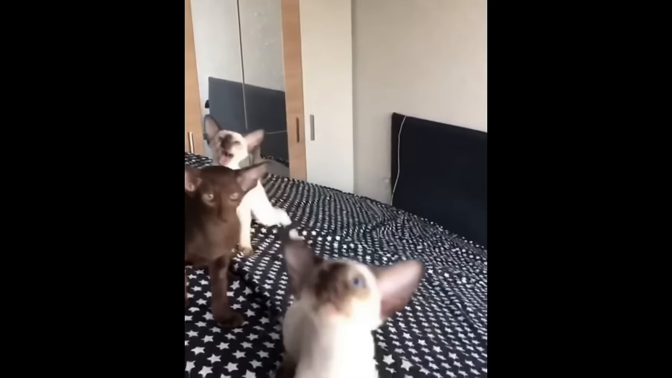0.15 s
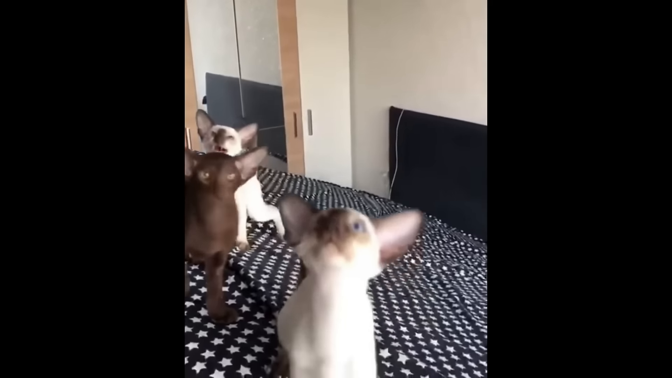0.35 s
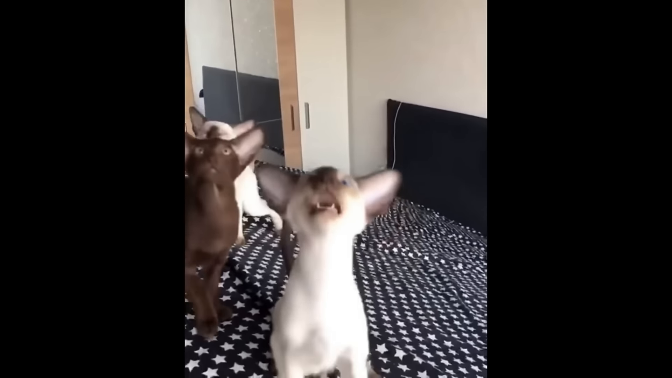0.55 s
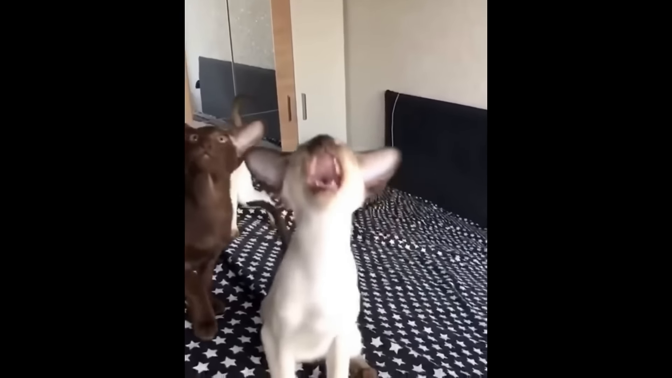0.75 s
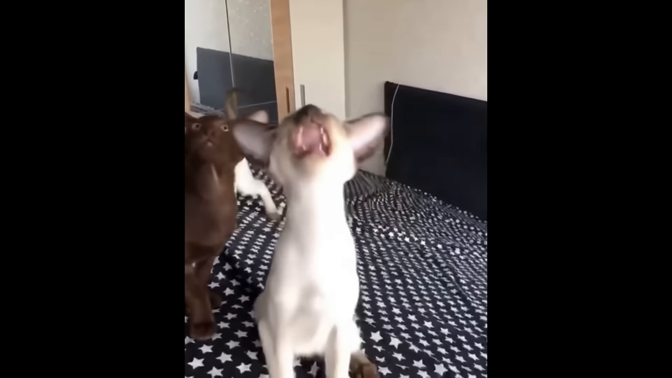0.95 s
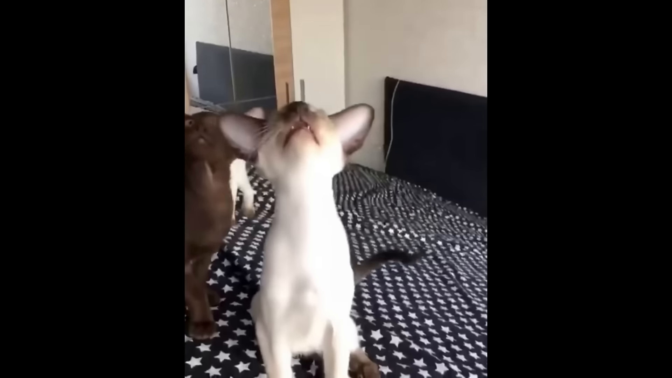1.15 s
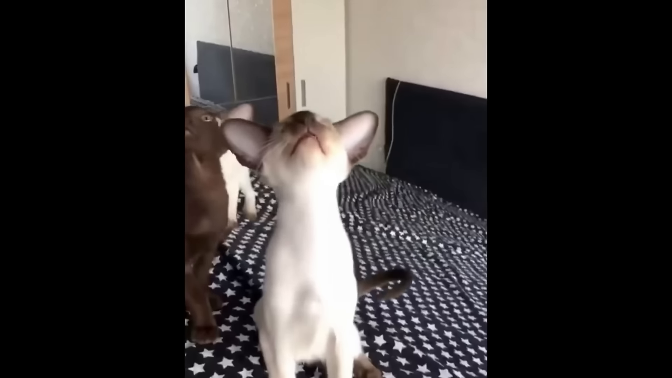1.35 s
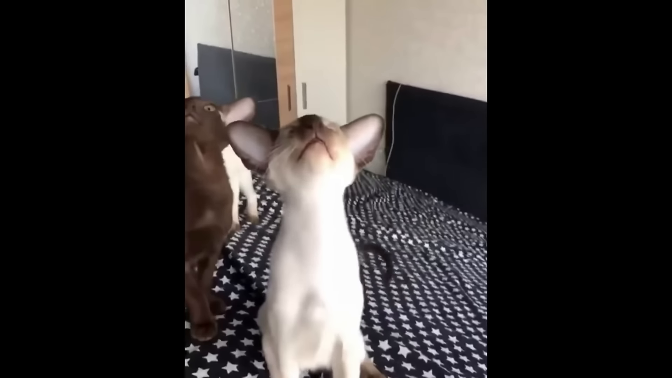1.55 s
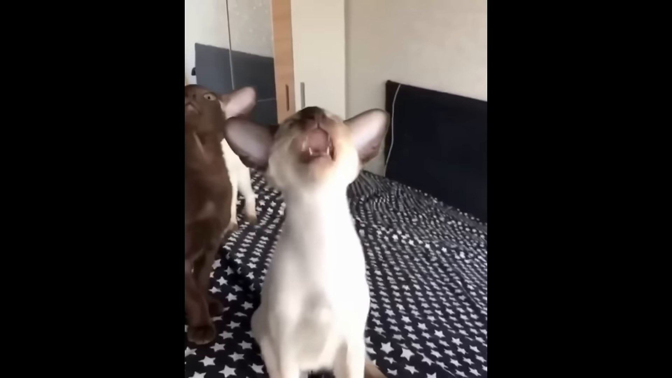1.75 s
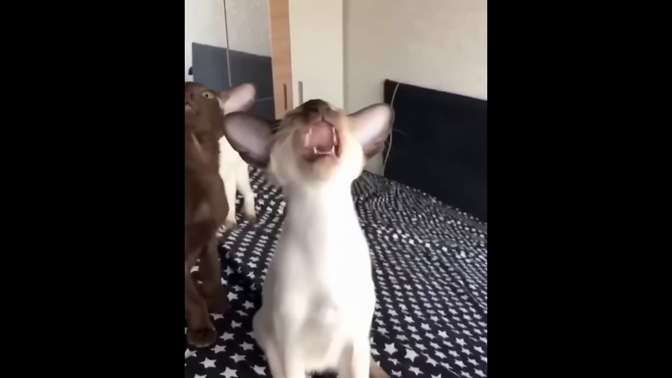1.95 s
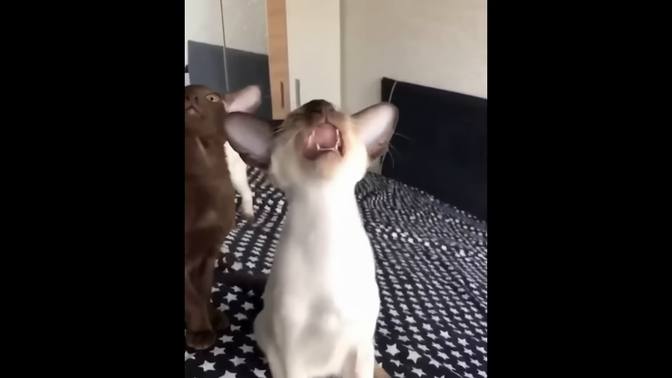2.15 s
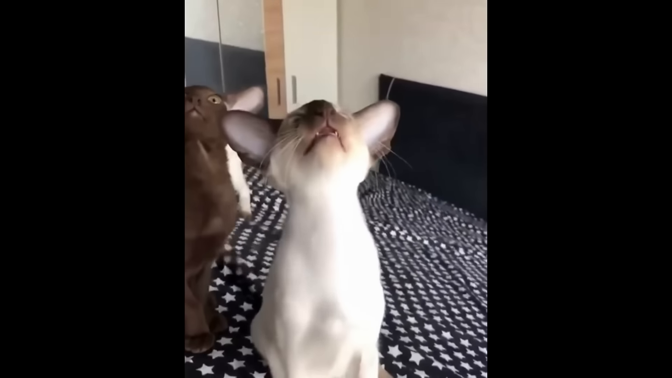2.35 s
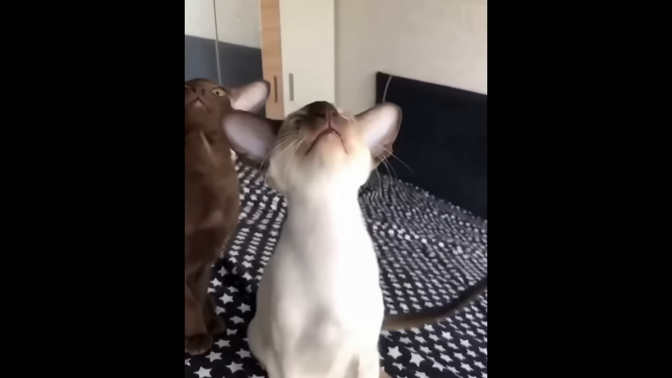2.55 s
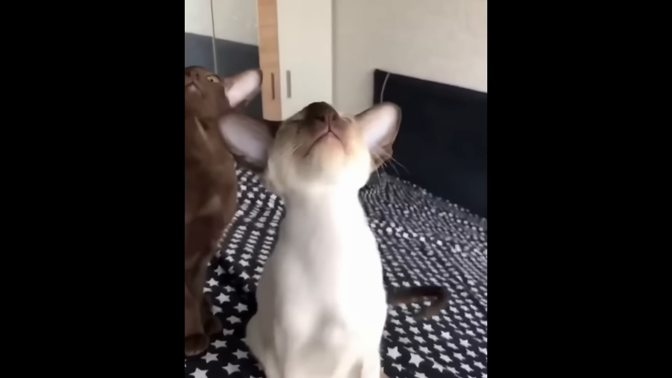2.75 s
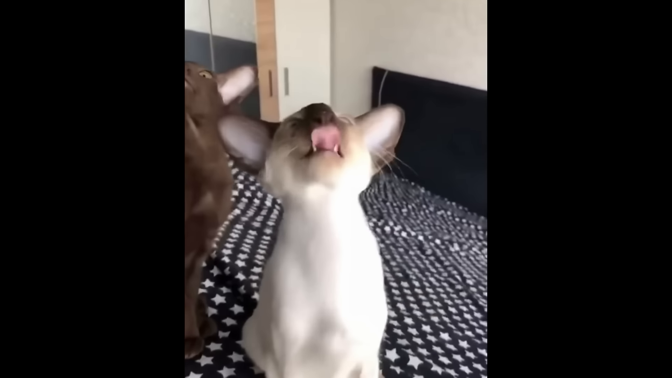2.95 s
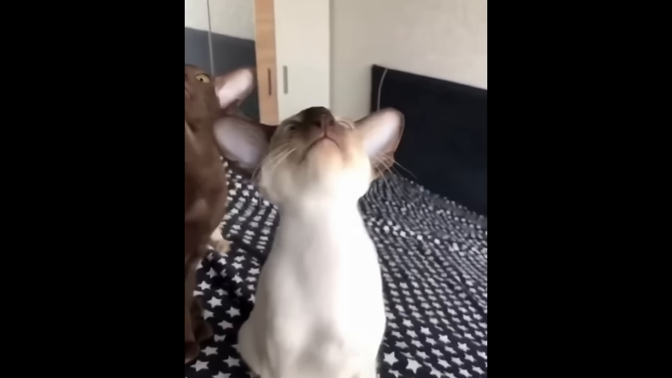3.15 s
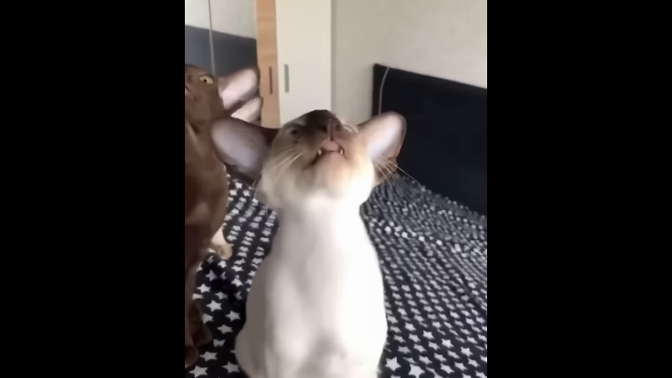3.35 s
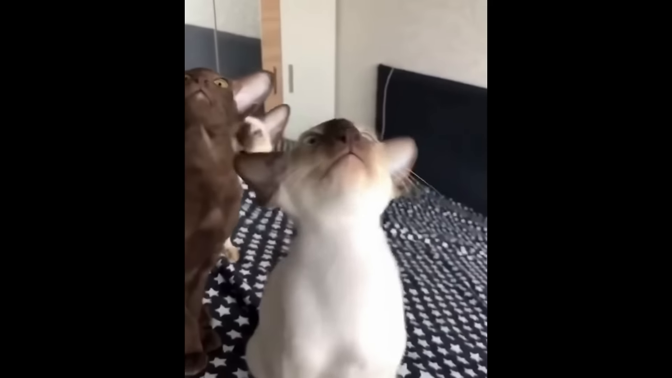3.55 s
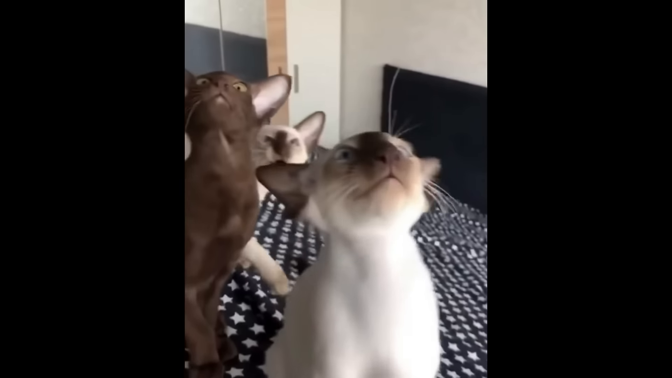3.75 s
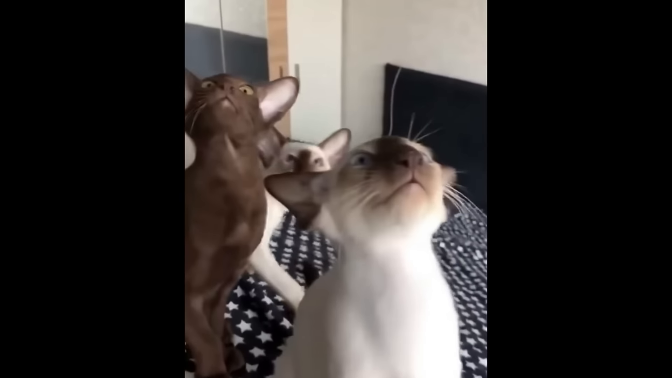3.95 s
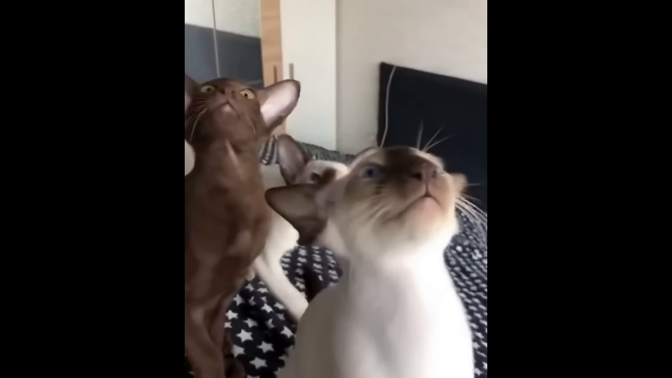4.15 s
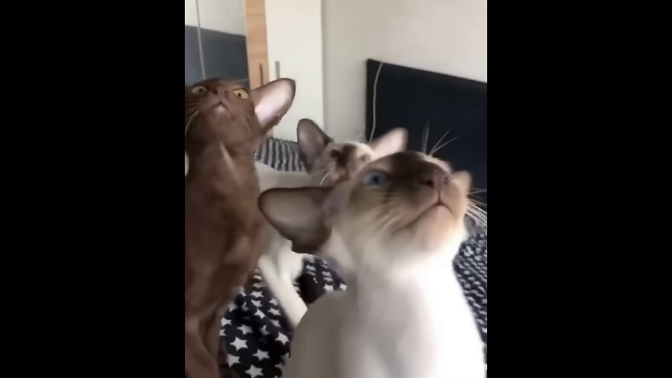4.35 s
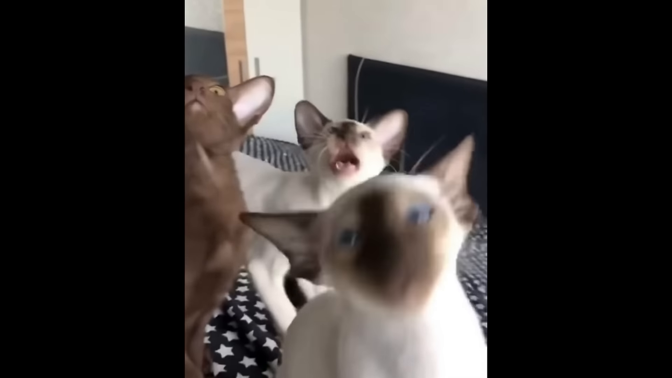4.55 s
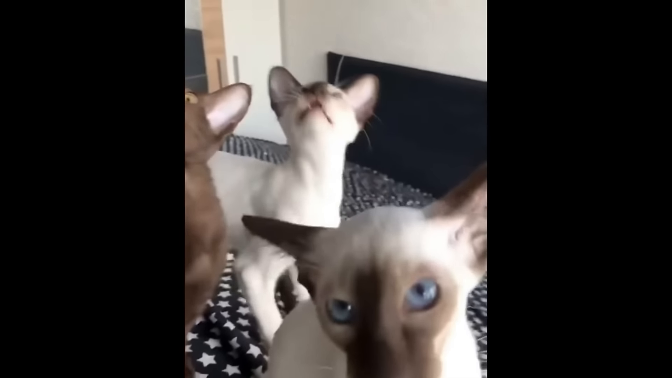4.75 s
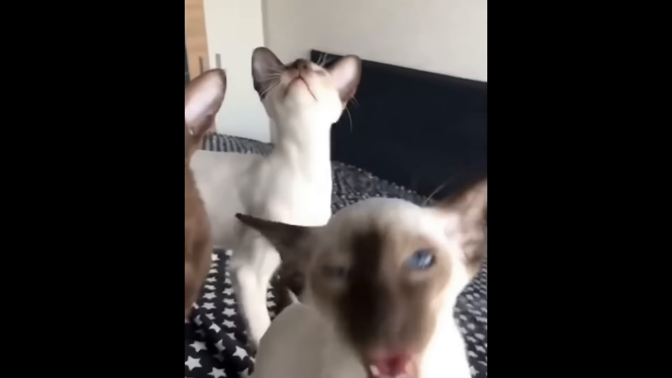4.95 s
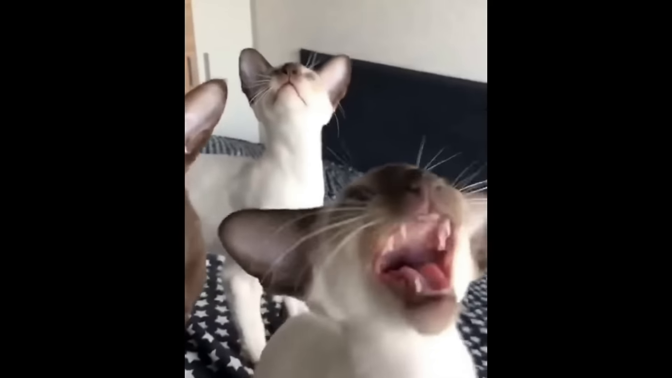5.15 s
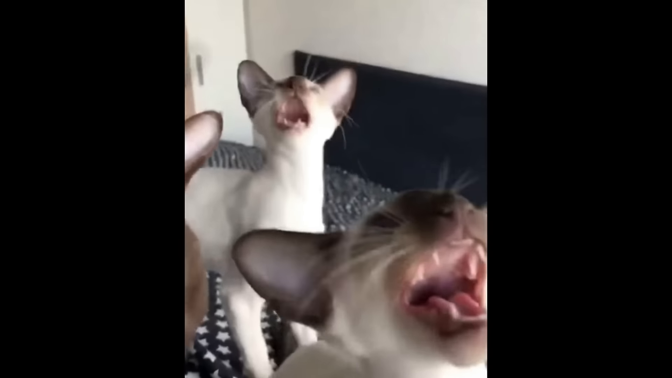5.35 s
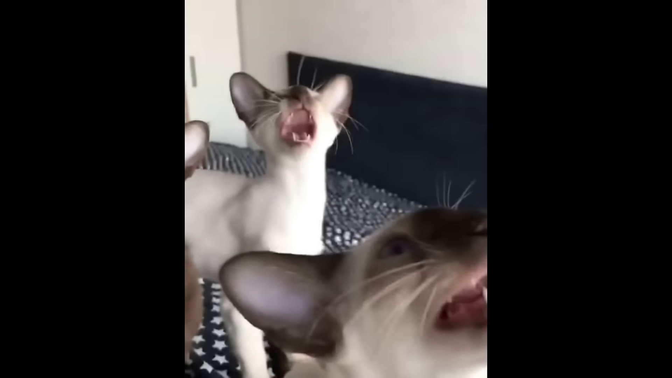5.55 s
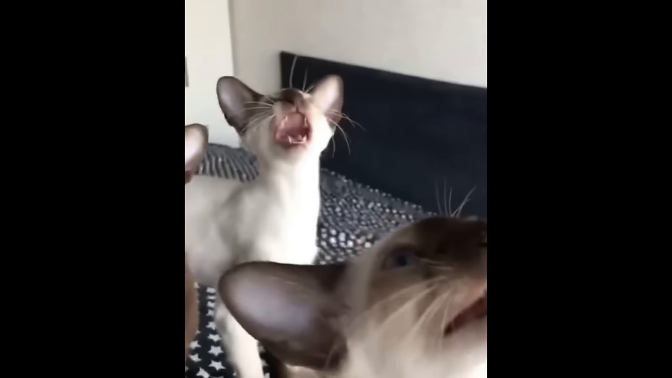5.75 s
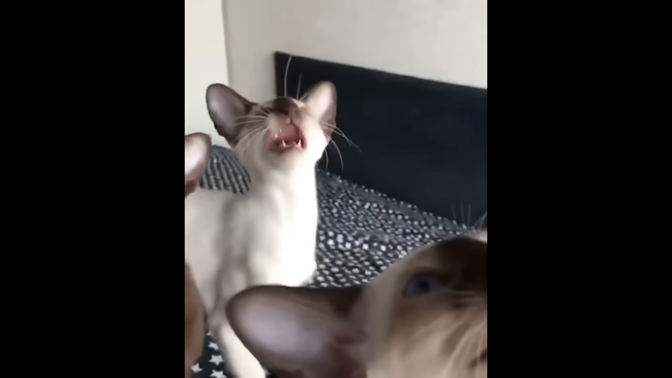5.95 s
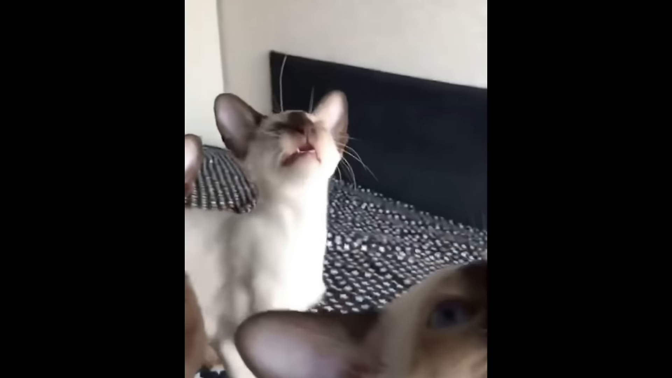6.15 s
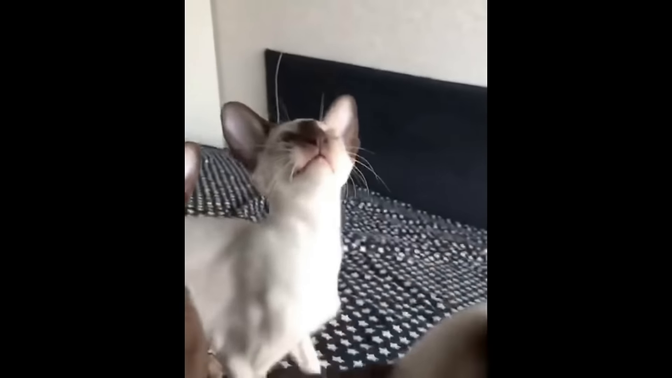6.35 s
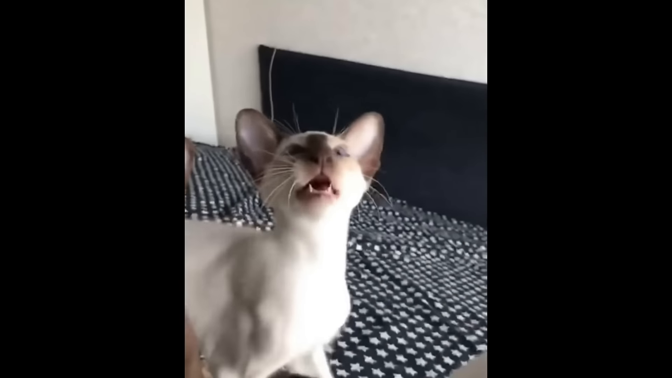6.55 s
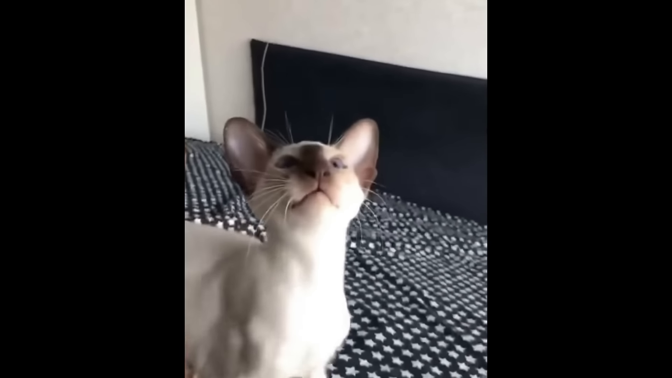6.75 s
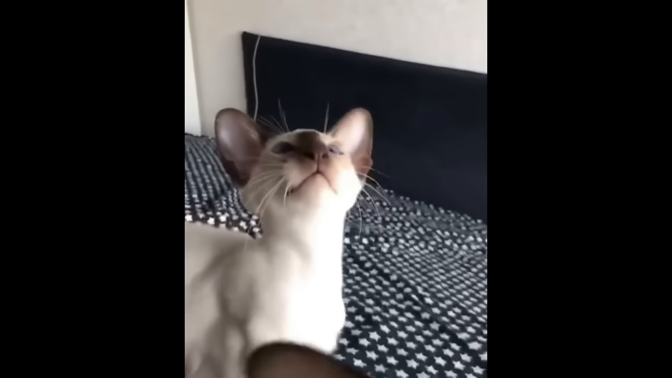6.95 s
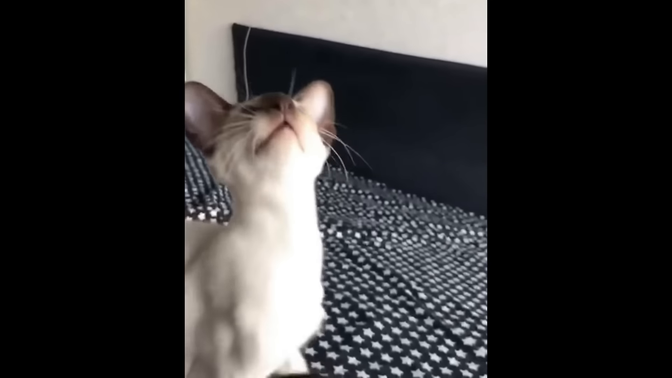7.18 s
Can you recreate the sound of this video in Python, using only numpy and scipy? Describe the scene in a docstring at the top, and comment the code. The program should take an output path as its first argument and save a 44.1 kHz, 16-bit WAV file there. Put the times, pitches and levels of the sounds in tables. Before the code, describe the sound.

Several cats in a small bedroom meow in turn, clear rising-and-falling cries mixed with hoarse cracking wails, growing louder and closer toward the end.

```python
"""A small bedroom: several cats on a bed meow in turn, at times two at once, close to the microphone.
Each meow is a stack of 18 partials on a gliding pitch, clean when settled and hoarse at breaks and some ends,
with noise for the leaking air. A huff is unvoiced noise; lips smack and paws thud as damped rings;
a paw scuffs the cover as grainy noise, a low groan is noise in resonances, and the room hums faintly."""
import sys
import numpy as np
from scipy import signal
from scipy.fft import rfft, irfft
from scipy.io import wavfile

SR = 44100
rng = np.random.default_rng(int(sys.argv[2]) if len(sys.argv) > 2 else 0)


def generate_wav(signal):
    """Clip the signal to [-1, 1] and save it as 16-bit WAV at the path in sys.argv[1]."""
    frames = np.transpose(np.atleast_2d(signal))
    scaled = np.clip(frames, -1, 1) * 32767
    pcm = np.round(scaled).astype(np.int16)
    wavfile.write(sys.argv[1], SR, pcm)


N = 318190


def from_db(db):
    """Amplitude of a level in dB."""
    return 10 ** (np.asarray(db) / 20)


def rms_one(x):
    """Scale a signal to rms 1."""
    return x / np.sqrt(np.mean(x ** 2) + 1e-20)


def at_hz(points, hz):
    """Read a spectrum in dB, in straight lines over log frequency."""
    corner_hz, corner_db = np.array(points).T
    return np.interp(np.log(hz), np.log(corner_hz), corner_db)


def span(rows):
    """First sample, sample times, short end fades and the interpolated columns of one table."""
    s, *columns = np.transpose(rows)
    first = max(round(s[0] * SR), 0)
    t = np.arange(first, min(round(s[-1] * SR), N)) / SR
    fade = np.clip(np.minimum(t - s[0], s[-1] - t) / 0.004, 0, 1)
    return first, t, fade, [np.interp(t, s, c) for c in columns]


def wobble(size, hz):
    """Slow random motion: noise twice through a one-pole low-pass, rms 1."""
    r = np.exp(-2 * np.pi * hz / SR)
    settle = 3000   # samples dropped while the filter settles
    noise = rng.standard_normal(size + settle)
    return rms_one(signal.lfilter([1], [1, -2 * r, r * r], noise)[settle:])


def coloured(size, spectrum):
    """Noise of the given spectrum, rms 1."""
    hz = np.maximum(np.fft.rfftfreq(size, 1 / SR), 1)
    shaped = rfft(rng.standard_normal(size)) * from_db(at_hz(spectrum, hz))
    return rms_one(irfft(shaped, size))


def resonate(x, hz, width):
    """A two-pole resonance of the given centre and width in Hz."""
    r = np.exp(-np.pi * width / SR)
    poles = [1, -2 * r * np.cos(2 * np.pi * hz / SR), r * r]
    return signal.lfilter([(1 - r * r) / 2, 0, (r * r - 1) / 2], poles, x + 1e-18)


# Instants at which the voice breaks, in seconds.
VOICE_CRACKS = [2.895, 3.135, 3.465]
CRACK_S, CRACK_DROP, CRACK_ROUGH = .011, .12, .2   # half length (s), share of pitch lost, hoarseness added
CROAK_HZ, CROAK_SPAN_HZ, CROAK_ROUGH = 640, 40, .3   # a voice that sinks below this pitch croaks
HOARSE_END_S = .05   # the end of a meow frays for this long


def hoarseness(t, begin_s, stop_s, pitch, open_db, hoarse, strain, crack):
    """Unevenness of the vocal folds: settled, plus onset, cracks, frayed end, strain and croak."""
    settled, start, settle_s, end = hoarse
    rough = settled + start * np.exp(-((t - begin_s) / settle_s) ** 4.0)
    rough = rough + CRACK_ROUGH * crack
    rough = rough + end * np.clip(1 - (stop_s - t) / HOARSE_END_S, 0, 1)
    rough = rough + strain * np.maximum(open_db + 15, 0)   # a mouth opened beyond -15 dB strains
    return rough + CROAK_ROUGH * np.clip((CROAK_HZ - pitch) / CROAK_SPAN_HZ, 0, 1)


SECOND_FOLLOWS, THIRD_FOLLOWS = 0.53, 1.018   # share of the mouth opening felt by the 2nd and 3rd partial
CLOSED_TILT = 0.34   # above the 4th partial: dB per octave lost for each dB that the mouth closes
SHUT_DB = -20   # mouth opening that counts as shut
SHRILL_HZ, SHRILL_WIDTH_HZ = 4420, 500


def partial_gains(orders, pitch, db, open_db, facing_db, manner, throat, mouth):
    """Throat and mouth weight the partials; those from the 4th up share the level set by the opening."""
    second_db, third_db, odd_db, shrill_db = manner
    second = db + second_db + SECOND_FOLLOWS * open_db
    third = db + third_db + THIRD_FOLLOWS * open_db + at_hz(mouth, orders[2] * pitch)
    high_hz = orders[3:] * pitch
    beam = np.clip(2 * np.log2(high_hz / 4800), 0, 1)   # only short waves are beamed forward
    high_db = at_hz(throat, high_hz) + facing_db * beam
    high_db = high_db + shrill_db * np.exp(-((high_hz - SHRILL_HZ) / SHRILL_WIDTH_HZ) ** 2)
    high_db = high_db + CLOSED_TILT * np.minimum(open_db, 0) * np.log2(orders[3:] / orders[3])
    high = from_db(high_db)
    high = from_db(db + open_db) * high / np.sqrt(np.sum(high ** 2, axis=0))
    sway = np.array([wobble(len(pitch), 7.2) for k in orders])   # the mouth never holds still
    gains = np.vstack([from_db([db, second, third]), high])
    gains = gains * from_db(1.8 * sway * np.sqrt(orders) * (orders > 3))
    gains[2::2] *= from_db(odd_db * np.clip(open_db / SHUT_DB, 0, 1))   # odd overtones, mouth shut
    return gains


# Air past the teeth. Each row: frequency in Hz, relative level in dB per Hz.
TEETH_SPECTRUM = [(3000, -31.5), (6000, -0.5), (8000, 4.5), (9500, -13.5)]
ATTACK_S = .007
RELEASE_S, RELEASE_DB = 0.054, -33.5
TURN_LATE = 2.86   # the head turns mostly towards the end of a meow: power of the elapsed share


def meow(rows, manner, hoarse, strain, throat, mouth):
    """Vocal folds: uneven cycles smear the partials, the higher the more; leaking air hisses."""
    orders = np.arange(1, 19)[:, None]
    begin_s, stop_s = rows[0][0], rows[-1][0]
    released = rows + [(stop_s + RELEASE_S, *rows[-1][1:])]
    first, t, fade, (pitch, db, open_db) = span(released)
    size = len(t)
    db = db + RELEASE_DB * np.clip((t - stop_s) / RELEASE_S, 0, 1)
    fade = fade * np.clip((t - begin_s) / ATTACK_S, 0, 1)

    crack = np.sum(np.exp(-((t - np.array(VOICE_CRACKS)[:, None]) / CRACK_S) ** 2), axis=0)
    rough = hoarseness(t, begin_s, stop_s, pitch, open_db, hoarse, strain, crack)
    pitch = pitch * (1 - CRACK_DROP * crack)
    pitch = pitch * (1 + rough * 0.043 * wobble(size, 43.1))   # a hoarse voice wavers
    cycles = np.cumsum(pitch) / SR + rough * .033 * wobble(size, 150)

    elapsed = np.clip((t - begin_s) / (stop_s - begin_s), 0, 1)
    facing_db = np.interp(elapsed ** TURN_LATE, [0, 1], manner[4:])
    gains = partial_gains(orders, pitch, db, open_db, facing_db, manner[:4], throat, mouth)
    broken = np.array([wobble(size, 70) for k in orders])   # hoarse partials break up one by one
    gains = gains * from_db(rough * 7.5 * broken * (orders > 1))
    phases = 2 * np.pi * orders * cycles + 0.45 * orders ** 2
    tone = np.sum(gains * np.cos(phases), axis=0) * np.sqrt(2)
    shimmer = from_db(rough * 2.16 * wobble(size, 120))

    puffs = 1 + np.cos(2 * np.pi * cycles)   # air escapes once a cycle
    effort = np.sqrt(np.sum(gains[2:] ** 2, axis=0))
    hiss = coloured(size, throat) + from_db(facing_db - 3.5) * coloured(size, TEETH_SPECTRUM)
    air = rough * .32 * effort * puffs * hiss
    return first, fade * (tone * shimmer + air)


def voice(meows, manners, hoarse_rows, strain, throat, mouth):
    """Lay the meows of one throat along the timeline; overlaps add."""
    out = np.zeros(N)
    for rows, manner, hoarse in zip(meows, manners, hoarse_rows):
        first, sound = meow(rows, manner, hoarse, strain, throat, mouth)
        out[first:first + len(sound)] += sound
    return out


# First voice, one table per meow. Each row: time in seconds, pitch in Hz, fundamental in dB,
# mouth opening as the overtones from the 4th partial up over the fundamental in dB.
FIRST_MEOWS = [
    [(.078, 1010, -55, -8), (.207, 1084, -62.5, 0), (.27, 1063, -59.5, -4.5), (.398, 1092, -56, -4),
     (.47, 1105, -59, -0.5), (.524, 1113, -67.5, 6), (.62, 1110, -56, 3.5)],
    [(.632, 851, -50.5, -4.5), (.66, 785, -49.5, 4), (.73, 880, -49.5, 6.5), (.775, 978, -46.5, -22),
     (.81, 894, -62, 0)],
    [(.85, 1000, -44, -11.5), (.901, 906, -46, 1), (.928, 940, -48, 6.5), (.965, 1013, -42, -16),
     (1.19, 986, -48.5, -17.5), (1.21, 963, -61.5, -6), (1.25, 960, -69, 1)],
    [(1.823, 836, -55, -0.5), (1.855, 811, -56, 11), (1.886, 845, -49, 4.5), (1.93, 945, -52.5, -13),
     (2.05, 971, -42.5, -17.5), (2.075, 937, -46.5, 2.5), (2.115, 936, -49.5, 5.5), (2.14, 976, -45, -3),
     (2.175, 1030, -43, -15), (2.338, 930, -52.5, -16), (2.365, 910, -70, 2.5)],
    [(4.972, 773, -53, -21), (5.015, 802, -54.5, -4.5), (5.045, 849, -47, 6), (5.09, 891, -43.5, 5),
     (5.133, 958, -42.5, -5.5), (5.181, 1004, -39.5, -6), (5.226, 950, -41.5, 3.5),
     (5.256, 1049, -38, -8.5), (5.355, 1010, -38, -3), (5.47, 1048, -38, -7), (5.62, 997, -41.5, -12.5)],
    [(6.726, 955, -40, -24), (6.765, 891, -38, -0.5), (6.8, 913, -42.5, 3), (6.835, 969, -37.5, -7),
     (6.86, 1027, -35.5, -18), (6.95, 995, -31, -13), (7.032, 1047, -33, -17), (7.145, 1065, -31.5, -12),
     (7.214, 1083, -30, -19)],
]
# One row per meow: 2nd partial over the fundamental (opening at 0 dB) in dB, lift of the 3rd partial in dB,
# lift of odd overtones with the mouth shut in dB, relative lift of the shrill resonance in dB,
# mouth turned to the microphone as heard in the treble, at the start in dB, at the end in dB.
FIRST_MANNER = [(-5.5, 6, -1, 3.5, -6, -10), (-2.5, 2, 1, 0.1, 0, -6), (0.1, 0.8, -9.5, 5, -0.5, 0),
                (1.4, 0.8, -5, 1.5, -0.7, -0.5), (-2.5, 3.5, -0.5, -0.7, -2.5, 5),
                (5, -2.2, 0.1, -1.1, 1.5, 0)]
# Hoarseness, one row per meow: settled 0-1, added at the start 0-1, settles within seconds,
# added at the end 0-1.
FIRST_HOARSE = [(.17, .3, .04, 0), (.14, .15, .07, .2), (.04, .1, .1, .6), (.04, .2, .07, .8),
                (.02, 0, .1, 0), (.02, .1, .12, 0)]
# Throat and mouth. Each row: frequency in Hz, relative level in dB per Hz.
FIRST_THROAT = [(880, -52.5), (1500, -8.5), (1750, -8.5), (1980, 1.5), (2170, 1.5), (3210, -16.5),
                (6320, -25.5), (8530, -29.5), (9430, -12), (12300, -46), (20700, -120)]
# Mouth resonance swept by the 3rd partial. Each row: frequency in Hz, level over the higher partials in dB.
FIRST_MOUTH = [(2300, -1.9), (2650, 2.5), (2850, -1), (3150, -10)]


def first_voice():
    """Meows mostly near 1000 Hz; opening the mouth strains the folds by .007 hoarseness per dB."""
    return voice(FIRST_MEOWS, FIRST_MANNER, FIRST_HOARSE, .007, FIRST_THROAT, FIRST_MOUTH)


# Second voice, one table per meow: two short hoarse answers near 1000 Hz under the first meow,
# then lower meows. Each row: time in seconds, pitch in Hz, fundamental in dB,
# mouth opening as the overtones from the 4th partial up over the fundamental in dB.
SECOND_MEOWS = [
    [(.207, 997, -67, 12), (.232, 923, -52.5, 1), (.27, 974, -67.5, 10.5), (.31, 997, -60.5, -2.5)],
    [(.482, 1037, -48.5, -6.5), (.506, 1050, -54.5, 2.5), (.57, 1036, -64, 5)],
    [(2.547, 861, -54, -6), (2.575, 823, -59.5, 8), (2.614, 815, -60, 5.5), (2.621, 572, -57, 5.5),
     (2.64, 566, -59.5, 5), (2.647, 885, -60, 4.5), (2.7, 997, -60, -6), (2.75, 1021, -58, 1),
     (2.805, 997, -53.5, 5), (2.865, 725, -67.5, 20.5), (2.9, 695, -64, 23.5), (2.96, 753, -64, 14.5),
     (3.03, 879, -56, 4.5), (3.05, 811, -54, 5), (3.095, 822, -60, 12), (3.14, 703, -55, 9.5),
     (3.206, 799, -66, 14), (3.284, 782.4, -58.5, 12), (3.331, 707.6, -56.5, 13), (3.36, 743, -59, 12.5),
     (3.43, 742, -55, 7), (3.47, 717, -52.5, 3.5), (3.553, 777, -55, 1.5), (3.622, 684.3, -55.5, 10),
     (3.753, 697.3, -58, 16.5), (3.783, 671, -56.5, 15), (3.795, 594, -51.5, 11.5), (3.822, 631, -56.5, 14),
     (3.87, 549, -53.5, 9.5)],
    [(4.25, 798, -56, -10), (4.284, 926, -56, 3.5), (4.3, 768, -57, 5), (4.346, 846, -58, 3.5),
     (4.376, 774, -53.5, -1), (4.403, 828, -55.5, 4), (4.475, 804.4, -54.5, 7), (4.55, 758.6, -58.5, 10),
     (4.607, 786, -58, 8), (4.657, 708, -53, 10), (4.668, 568, -51.5, 4), (4.7, 566, -50, 1.5)],
    [(5.36, 884, -55, 0), (5.4, 772, -59, 0), (5.46, 866, -55, 4.5), (5.519, 911, -54.5, 8),
     (5.59, 861, -54, 10), (5.605, 733, -57.5, 12.5), (5.783, 772, -58.5, 14), (5.9, 702, -53, 14),
     (6.0, 647, -55, 20.5), (6.106, 624.5, -51, 13), (6.125, 577, -49, 6.5), (6.14, 521.5, -51, 5)],
    [(6.552, 707, -40, -20), (6.564, 555, -50.5, -7.5), (6.6, 531, -55, 7.5), (6.618, 477, -50, -4),
     (6.635, 457, -56.5, -3)],
]
# One row per meow: 2nd partial over the fundamental (opening at 0 dB) in dB, lift of the 3rd partial in dB,
# lift of odd overtones with the mouth shut in dB, relative lift of the shrill resonance in dB,
# mouth turned to the microphone as heard in the treble, at the start in dB, at the end in dB.
SECOND_MANNER = [(-4.5, -2.5, 0, -4, -10.5, 5), (-11, -3, 0, 9, -24, -11), (-1.5, 0.3, 0, 3.5, -6, 8.5),
                 (2.5, 3, 0, -0.5, -2.5, 7), (0.5, 0, 0, 0, 2.2, 10.5), (5.1, 8.2, 0, -1, 7, 13)]
# Hoarseness, one row per meow: settled 0-1, added at the start 0-1, settles within seconds,
# added at the end 0-1.
SECOND_HOARSE = [(.6, 0, .05, 0), (.6, 0, .05, 0), (.04, .42, .95, 0), (.12, .4, .08, 0),
                 (.06, .28, .25, 0), (0, .1, .02, .1)]
# Throat and mouth. Each row: frequency in Hz, relative level in dB per Hz.
SECOND_THROAT = [(880, -33), (1500, -34), (1900, -1), (2380, 1), (3580, -11.5), (4270, -7), (5590, -25.5),
                 (8470, -29.5), (9430, -11), (12300, -80), (20700, -120)]
# Mouth resonance swept by the 3rd partial. Each row: frequency in Hz, level over the higher partials in dB.
SECOND_MOUTH = [(1700, -7.5), (2050, -7), (2350, 5.5), (2750, 3), (3000, -4)]


def second_voice():
    """Two short hoarse answers near 1000 Hz under the first meow, then lower meows that crack and croak."""
    return voice(SECOND_MEOWS, SECOND_MANNER, SECOND_HOARSE, 0, SECOND_THROAT, SECOND_MOUTH)


# A cat huffs before it meows. Each row: time in seconds, level of the throat air in dB.
HUFF_LEVEL = [(4.17, -74), (4.245, -61.5), (4.3, -63)]


def huff():
    """Unvoiced air through throat and teeth."""
    out = np.zeros(N)
    first, t, fade, (db,) = span(HUFF_LEVEL)
    air = coloured(len(t), SECOND_THROAT) + 0.89 * coloured(len(t), TEETH_SPECTRUM)
    out[first:first + len(t)] = fade * from_db(db) * air
    return out


def blips(events, turns):
    """Damped rings with grain, one per event; each decays by a factor e in this many cycles."""
    out = np.zeros(N)
    for s, db, hz in events:
        t = np.arange(round(4 * turns / hz * SR)) / SR
        ring = from_db(db) * np.sin(2 * np.pi * hz * t) * np.exp(-t * hz / turns)
        at = round(s * SR)
        out[at:at + len(t)] += ring * (1 + 0.3 * rng.standard_normal(len(t)))
    return out


# Lips part. Each row: start in seconds, level before the decay in dB, frequency in Hz.
LIP_SMACKS = [(2.4639, -56, 2750), (4.9297, -43, 6020), (4.9505, -37, 3200), (4.9708, -38, 3610),
              (6.4103, -56, 3830), (6.4704, -56, 5130), (6.4962, -49, 3570)]


def lips():
    """Lips part with a short ring."""
    return blips(LIP_SMACKS, turns=5.8)


# Paws land. Each row: start in seconds, level before the decay in dB, frequency in Hz.
PAW_THUDS = [(0.411, -50.5, 304), (4.567, -51, 190), (6.221, -56.5, 103)]


def paws():
    """Paws land with a dull, heavily damped ring."""
    return blips(PAW_THUDS, turns=1.7)


# A paw drags over the cover. Each row: time in seconds, level in dB.
SCUFF_LEVEL = [(1.62, -66), (1.65, -50.5), (1.8, -53), (1.87, -62)]
# Colour of the cover under the paw. Each row: frequency in Hz, relative level in dB per Hz.
SCUFF_SPECTRUM = [(120, -56), (200, -24), (347, -9.5), (493, -16.5), (709, -1.5), (878, -8), (3000, -27),
                  (4000, -29.5), (5200, -68), (8800, -120)]


def scuff():
    """Friction on the cover: coloured noise whose level jitters into grains."""
    out = np.zeros(N)
    first, t, fade, (db,) = span(SCUFF_LEVEL)
    grain_db = 1.3 * wobble(len(t), 60)
    out[first:first + len(t)] += fade * from_db(db + grain_db) * coloured(len(t), SCUFF_SPECTRUM)
    return out


# A low groan, perhaps the bed under load, one table per groan. Each row: time in seconds, level in dB.
GROAN_LEVELS = [
    [(3.62, -84), (3.66, -58.5), (3.92, -69)],
    [(4.2, -72.5), (4.32, -57), (4.45, -62.5), (4.58, -74)],
]
# Resonances of the groan. Each row: frequency in Hz, width in Hz, relative level in dB.
GROAN_RESONANCES = [(350.8, 6.4, 1.5), (217, 55, -12), (288, 140, -1)]


def groan():
    """Noise ringing in a few low resonances."""
    out = np.zeros(N)
    white = rng.standard_normal(N)
    modes = [from_db(db) * rms_one(resonate(white, hz, width)) for hz, width, db in GROAN_RESONANCES]
    ringing = rms_one(sum(modes))
    for rows in GROAN_LEVELS:
        first, t, fade, (db,) = span(rows)
        out[first:first + len(t)] += fade * from_db(db) * ringing[first:first + len(t)]
    return out


ROOM_T60_S, ROOM_DB = 0.33, -13   # decay by 60 dB; echo energy against the direct sound


def bedroom(x):
    """Diffuse echoes that start after 8 ms and die away, duller than the direct sound."""
    t = np.arange(SR // 2) / SR
    echoes = rng.standard_normal(len(t)) * from_db(-60 * t / ROOM_T60_S) * (t > .008)
    echoes = signal.lfilter([.5], [1, -.55], echoes)
    echoes = echoes / np.sqrt(np.sum(echoes ** 2))
    return from_db(ROOM_DB) * signal.fftconvolve(x, echoes)[:N]


# Hum of the room. Each row: frequency in Hz, relative level in dB per Hz.
ROOM_SPECTRUM = [(12, -63.5), (20, -21.5), (91, -7), (149, -6), (569, -15.5), (615, -14.5), (978, -19.5),
                 (1440, -21), (1590, -25.5), (9430, -28), (12300, -62), (20700, -120)]


def room_tone():
    """Steady coloured noise around -69 dB that drifts by about 1 dB."""
    return from_db(-69 + 1.0 * wobble(N, 3)) * coloured(N, ROOM_SPECTRUM)


def scene():
    """Cats and bed, their echoes in the bedroom, and the room tone."""
    cats = first_voice() + second_voice() + huff() + lips()
    bed = paws() + scuff() + groan()
    near = cats + bed
    return (near + bedroom(near) + room_tone())[None]


START_S, END_S = .084, 7.215
CUTOFF_HZ = 9800   # from here up everything is at least 60 dB down


def record(dry):
    """The sound starts after a short silence and stops just before the end; the top is cut."""
    t = np.arange(N) / SR
    on = (t >= START_S) * np.clip((END_S - t) / .002, 0, 1)
    low_pass = signal.cheby2(12, 60, CUTOFF_HZ, fs=SR, output="sos")
    return signal.sosfilt(low_pass, dry * on)


dry = scene()
out = record(dry)
generate_wav(out)
```